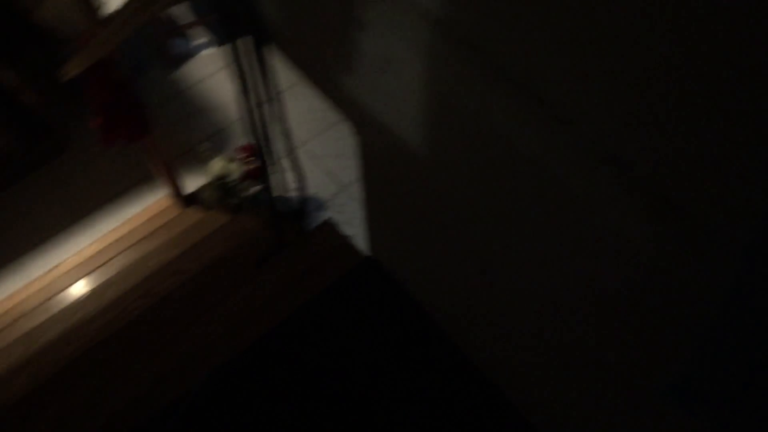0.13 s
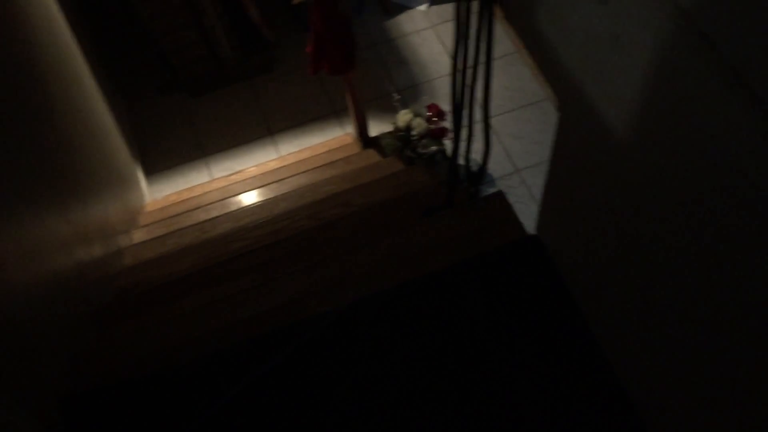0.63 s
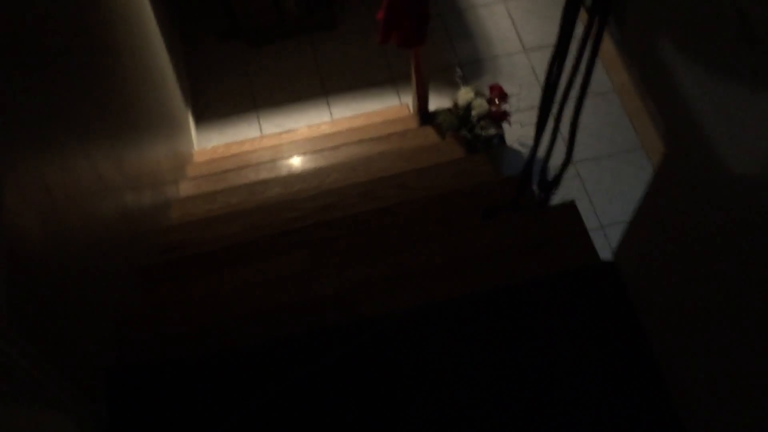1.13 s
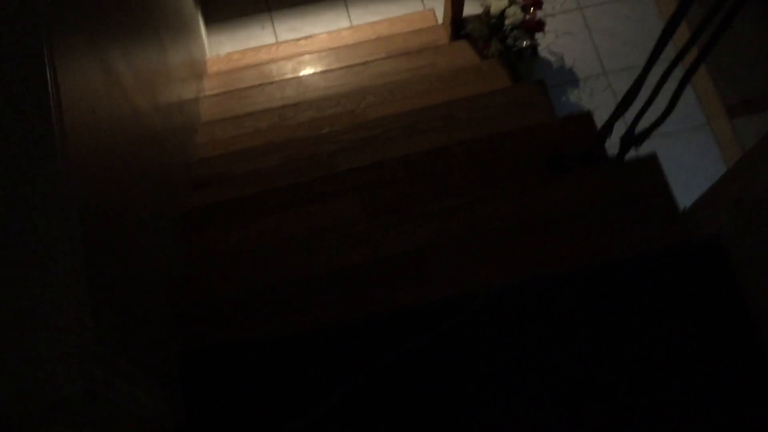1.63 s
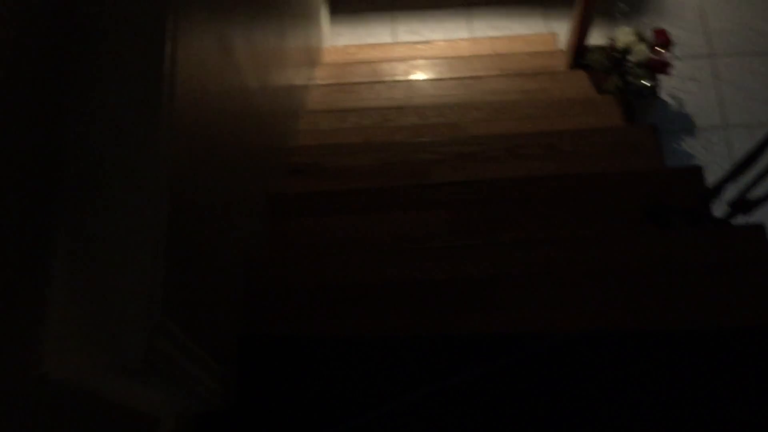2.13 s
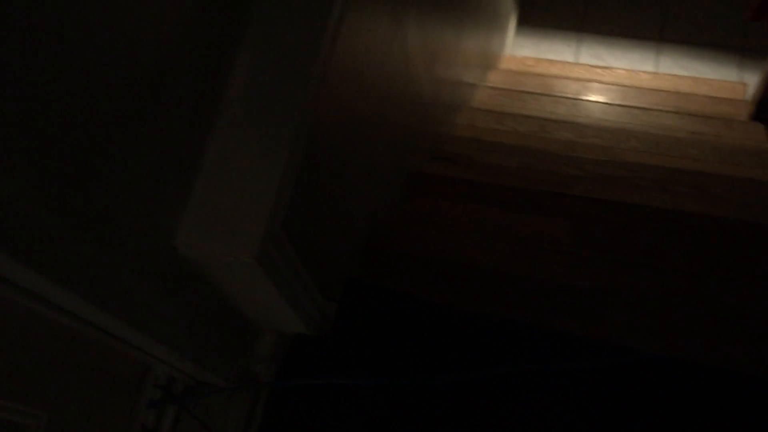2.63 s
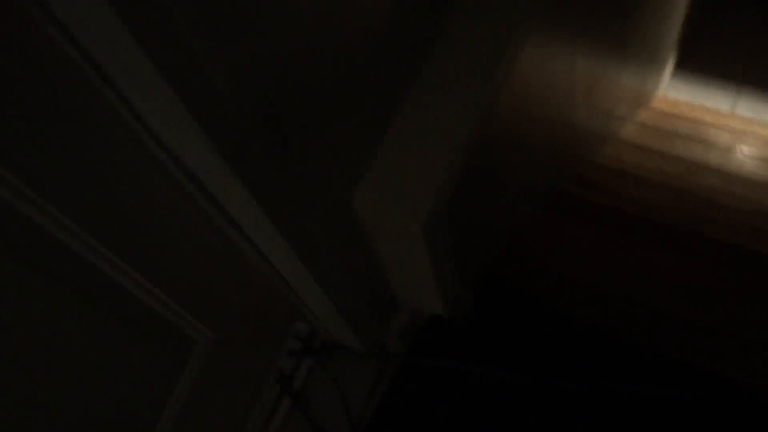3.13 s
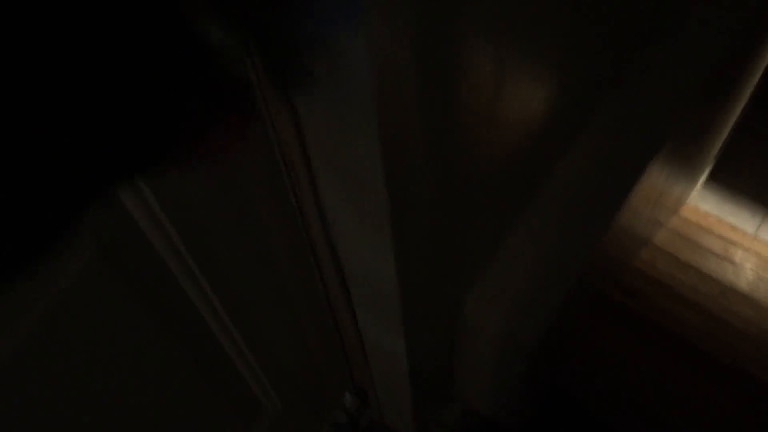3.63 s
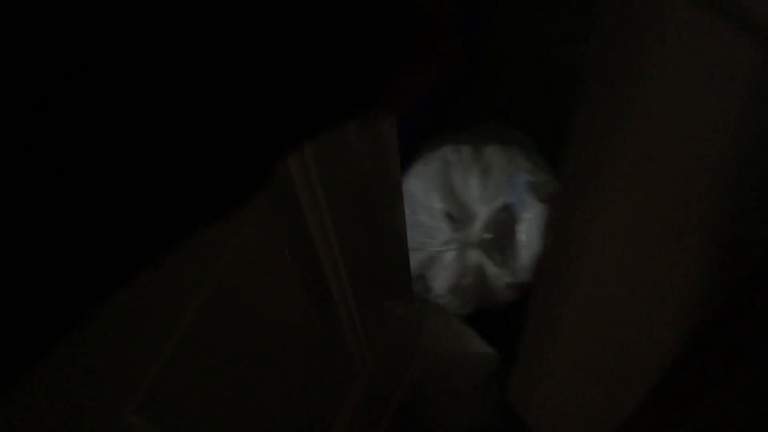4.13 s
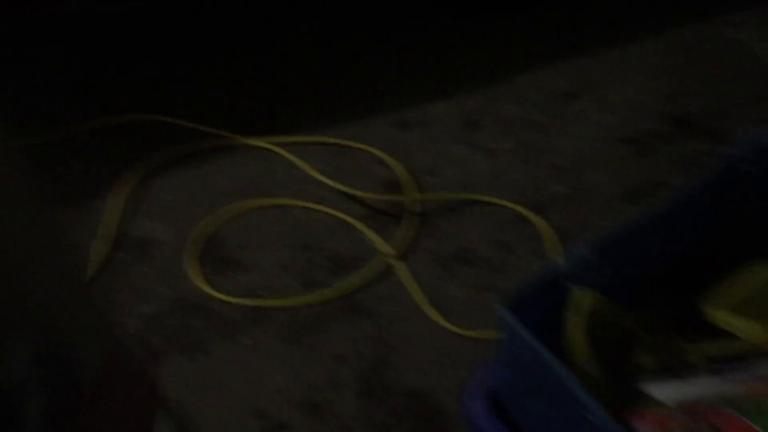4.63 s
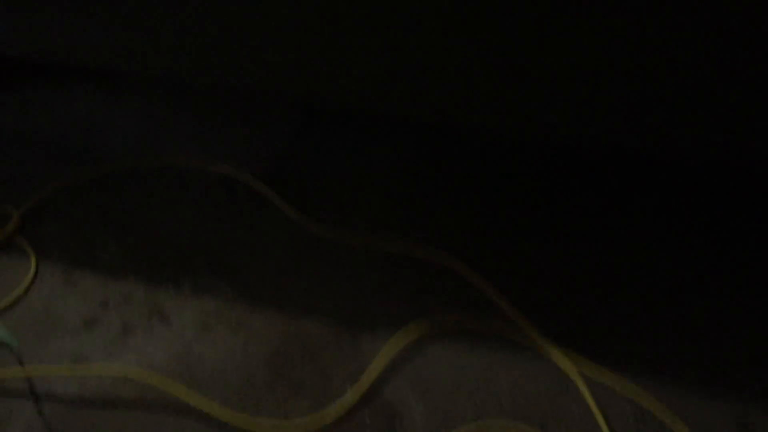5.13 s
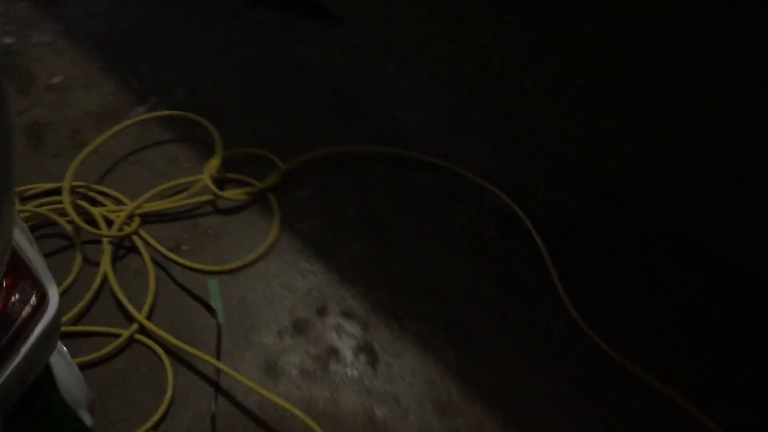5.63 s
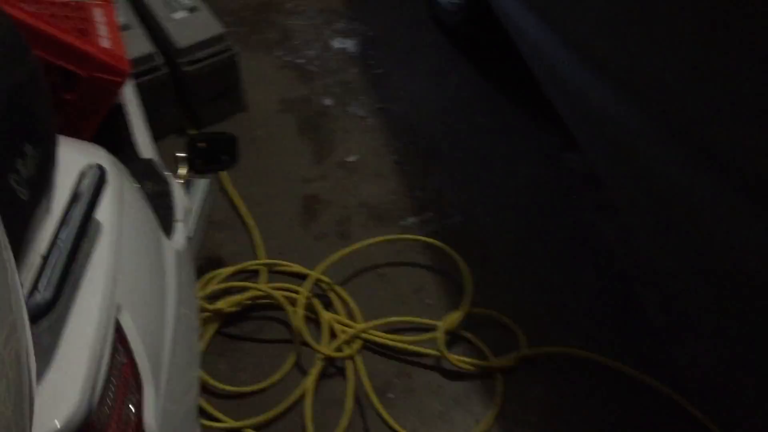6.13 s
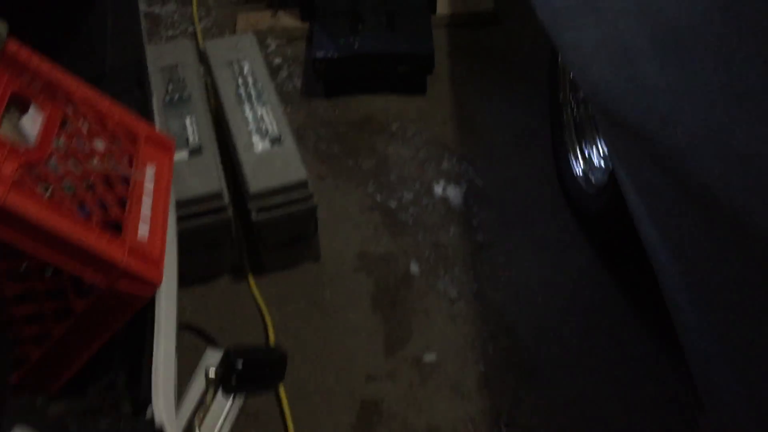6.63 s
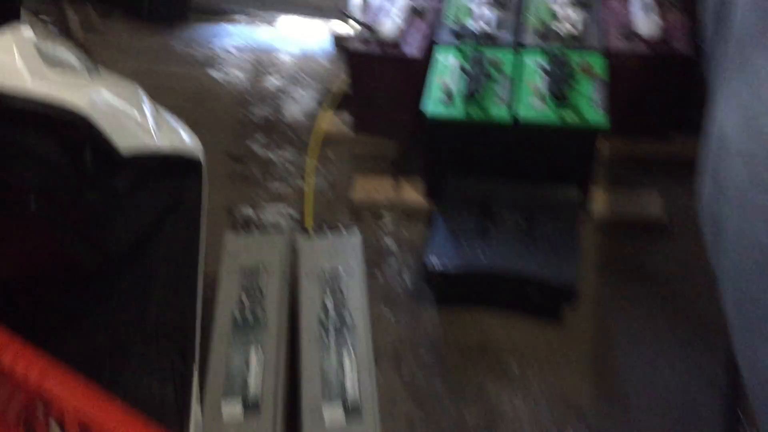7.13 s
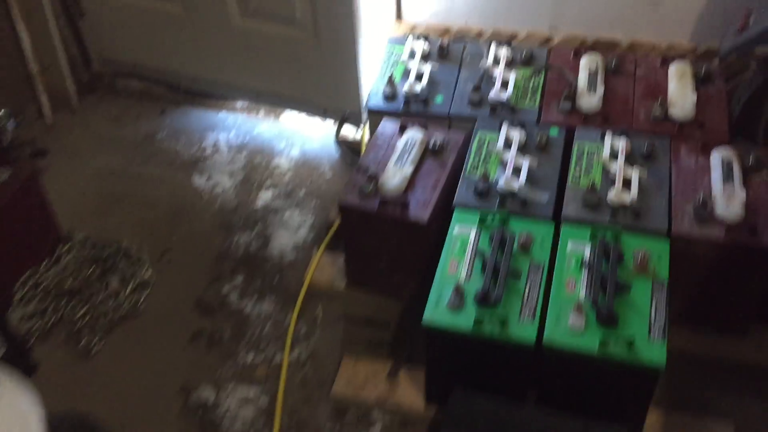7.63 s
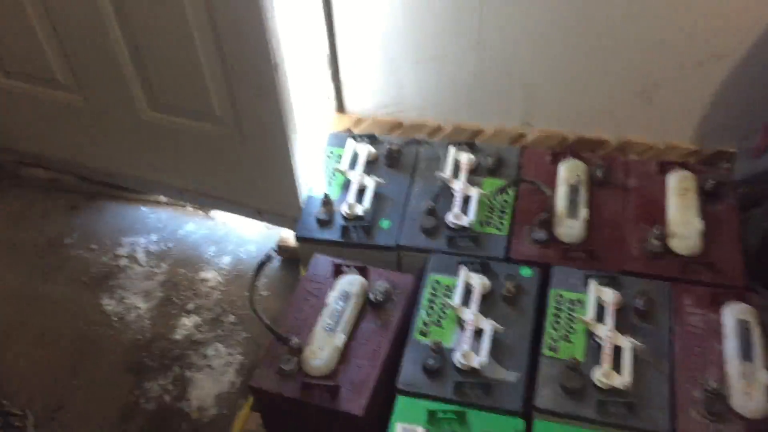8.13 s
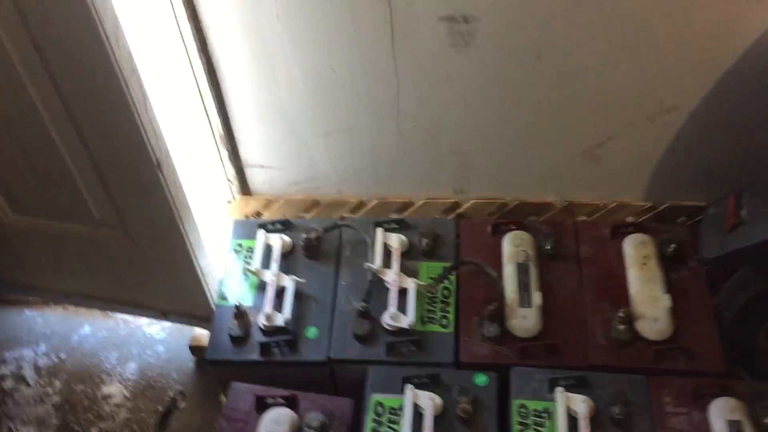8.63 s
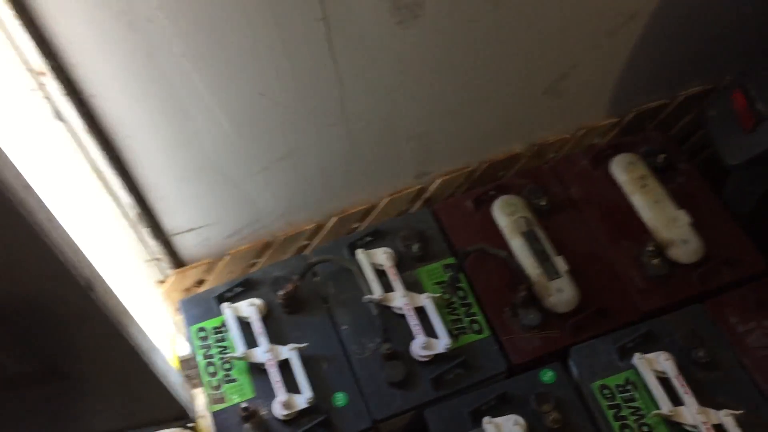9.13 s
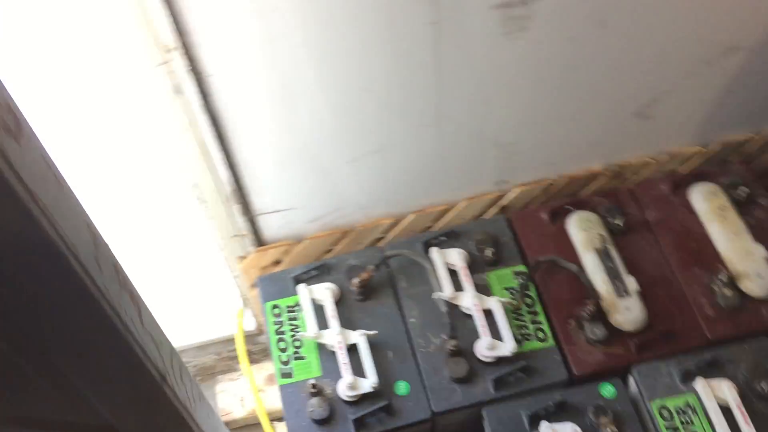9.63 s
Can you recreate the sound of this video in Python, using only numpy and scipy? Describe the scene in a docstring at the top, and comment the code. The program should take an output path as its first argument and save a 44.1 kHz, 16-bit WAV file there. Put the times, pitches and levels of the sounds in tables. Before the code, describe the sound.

Someone treads softly indoors, yanks a stuck door past its frame, jostles the camera, and scuffs over gritty concrete to a final hard clack.

```python
"""Microphone hiss and a faint mains hum lie under the first scuff and heel thud on a wooden landing.
The walker, camera in hand, drags a sticking door open past its frame and crosses a concrete garage.
Heels are low sagging tones, soles tap as noise in a broad resonance, and slides are one stream of grit.
The door is uneven stick-slip pulses ringing its leaf; jolts of the camera are low blows without room."""
import sys
import numpy as np
from scipy import signal
from scipy.fft import rfft, irfft, next_fast_len
from scipy.io import wavfile
from scipy.ndimage import uniform_filter1d, map_coordinates

SR = 44100
rng = np.random.default_rng(int(sys.argv[2]) if len(sys.argv) > 2 else 0)


def rack_gain(trim_db):
    """Turn a fader trim in dB into the linear factor to multiply a signal by."""
    fader = np.asarray(trim_db, float)
    return 10 ** (fader / 20)


def output_pcm(signal):
    """Save a mono or channel-first signal as 16-bit PCM at the path in sys.argv[1].

    Samples are clipped to [-1, 1] before scaling.
    """
    pcm = np.clip(np.atleast_2d(signal).T, -1, 1) * 32767
    wavfile.write(sys.argv[1], SR, np.round(pcm).astype(np.int16))


N = 429975

# weight landing on the floor or the door, before the room answers: [t/s, peak level/dB, f/Hz]
FOOTFALLS = [(0.048, -20.5, 85), (0.226, -38, 66), (0.75, -34, 105), (0.875, -31, 108), (1.055, -34, 127),
             (1.128, -32.5, 118), (1.321, -11.5, 112), (1.354, -20, 101.5), (1.401, -20.5, 108),
             (1.45, -44, 97), (1.846, -31.5, 198), (1.878, -23.5, 130), (1.9, -19, 91), (2.061, -36.5, 116),
             (2.358, -37, 104), (2.935, -26.5, 107), (3.008, -25, 102.6), (3.582, -34, 118),
             (3.635, -29, 118.5), (3.721, -35, 149), (3.895, -30, 221), (3.914, -25, 132),
             (3.993, -37, 143), (5.253, -26.5, 153), (5.281, -28, 154), (5.734, -35, 155), (5.79, -38, 223),
             (6.437, -33, 163), (6.65, -34.5, 89), (6.75, -36, 91), (6.87, -31, 107), (6.958, -39, 140),
             (7.003, -30.5, 110), (7.238, -29, 173), (7.367, -34.5, 115), (7.765, -34.5, 144),
             (8.111, -23.5, 164), (8.839, -31, 189.6), (9.437, -24.5, 195), (9.464, -24, 144),
             (9.52, -32.5, 141)]
# the hand jolting the camera while the door swings: [t/s, peak level/dB, f/Hz]
CAMERA_JOLTS = [(4.212, -22, 97), (4.287, -23.5, 112.3), (4.306, -22.5, 109), (4.426, -18.5, 108),
                (4.459, -26.5, 122), (4.631, -24, 142), (4.668, -21.5, 131), (4.692, -14.5, 200.6),
                (4.748, -23, 132), (4.778, -50, 96), (4.918, -32, 110), (4.963, -24.5, 81.6),
                (5.035, -22.5, 80), (5.115, -38.5, 90)]
# hard contacts of soles and latch: [t/s, peak level of the knock/dB, centre f/Hz, treble level re knock/dB]
CONTACTS = [(0.071, -40.5, 1850, -31.5), (1.319, -24.5, 950, -7.5), (1.391, -30.5, 665, -26.5),
            (1.478, -41.5, 3500, -26), (1.879, -27.5, 705, -25), (2.35, -43, 1800, -26.5),
            (3.586, -51, 1500, -9.5), (3.671, -37.5, 3500, 6), (3.69, -38, 1730, -19),
            (3.716, -39, 2480, -13.5), (3.752, -36, 1900, -22.5), (3.934, -12, 1070, -27.5),
            (3.959, -28, 3500, -8.5), (4.414, -35, 1800, -36), (4.565, -44, 2440, -7),
            (4.575, -25, 280, -33), (4.657, -35, 1320, -32), (4.695, -32, 328, -39),
            (5.241, -33, 600, -14.5), (5.259, -25.5, 5770, -16), (5.294, -17, 420, -23.5),
            (5.722, -18, 663, -43), (5.796, -22, 308, -13.5), (6.03, -45, 1610, -14.5),
            (6.407, -39.5, 1860, -38.5), (6.442, -34.5, 334, -42.5), (6.532, -29.5, 1610, -21),
            (6.742, -27.5, 910, -13.5), (6.916, -32, 1310, -27), (7.028, -35, 1700, -34),
            (7.2, -26.5, 298, -43), (7.241, -19.5, 280, -27.5), (7.534, -39.5, 850, -28),
            (7.765, -40, 470, -6.5), (8.114, -14.5, 1660, -13), (8.841, -43, 396, 10.5),
            (9.399, -38, 1530, -26), (9.442, -4, 1740, -24)]


def unit(x):
    """Scaled to rms 1."""
    return x / np.sqrt(np.mean(x ** 2) + 1e-20)


def along(points, hz):
    """(Hz, value) points read on a log frequency axis."""
    f, v = np.transpose(points)
    return np.interp(np.log(hz + 1), np.log(f + 1), v)


def curves(rows):
    """One value per sample for each column after the time, -120 dB outside the table."""
    s, *cols = np.transpose(rows)
    return [np.interp(np.arange(N) / SR, s, c, left=-120, right=-120) for c in cols]


def wobble(rate):
    """A smooth random curve, rate knots a second."""
    knots = rng.standard_normal(int(N * rate / SR) + 4)
    return map_coordinates(knots, [np.arange(N) * rate / SR])


def filtered(x, response):
    """x times a complex response of frequency."""
    m = next_fast_len(len(x) + SR // 2)
    return irfft(rfft(x, m) * response(np.fft.rfftfreq(m, 1 / SR)), m)[:len(x)]


def body(modes):
    """Causal response of (Hz, width in Hz, dB) resonances, alternating in sign."""
    def response(f):
        return sum((-1) ** k * rack_gain(db) * 1j * f * w / (c * c - f * f + 1j * f * w)
                   for k, (c, w, db) in enumerate(modes))
    return response


def add(track, s, sound):
    """Mixes a sound in at time s."""
    part = track[round(s * SR):][:len(sound)]
    part += sound[:len(part)]


def hiss():
    """Steady microphone noise, strongest in the bass and falling off through the treble."""
    # hiss spectrum: [f/Hz, relative level per Hz/dB]
    hiss_shape = [(20, -15), (60, 7), (130, 3), (300, 0), (700, -5), (1500, -6.5), (4000, -12),
                  (13000, -20), (16000, -21)]
    noise = filtered(rng.standard_normal(N), lambda f: rack_gain(along(hiss_shape, f)))
    return rack_gain(-65.5) * unit(noise)


def hum():
    """A mains tone wavering in pitch and level, that fades once the house is left."""
    # hum level, before its wavering: [t/s, level/dB]
    hum_level = [(0, -69), (2.3, -71), (2.7, -61.5), (3.3, -74.5), (4.2, -81), (9.75, -100)]
    turn = 2 * np.pi * np.cumsum(121 + 3 * wobble(6)) / SR  # around 121 Hz
    return rack_gain(curves(hum_level)[0] + 3.8 * wobble(1.7)) * np.sqrt(2) * np.sin(turn)


def shudder():
    """Lumpy low noise ringing in the joists: a slow swell plus the shake after each thud or jolt."""
    # low rumble under moving weight, before the aftershakes: [t/s, level/dB]
    swell = [(0, -60), (0.62, -67.5), (0.95, -57), (1.63, -63), (3.3, -77), (3.77, -50.5), (4.15, -48.5),
             (4.36, -61), (4.5, -55), (4.58, -71), (4.86, -57), (5.18, -63), (5.24, -72), (5.92, -60),
             (6.4, -71.5), (6.95, -37.5), (7.57, -83), (9.75, -70)]
    # joist resonances: [f/Hz, width/Hz, level/dB]
    joists = [(61, 31, 0.5), (108, 25, -3.5), (172.3, 62, -3)]
    aftershake_db, aftershake_t60_s = -17.5, 0.41  # level is relative to the blow's peak
    lumps = rng.standard_normal(N) * rack_gain(3.2 * wobble(25))
    level, t = rack_gain(curves(swell)[0]), np.arange(SR // 2) / SR
    for s, db, _ in FOOTFALLS + CAMERA_JOLTS:
        shake = rack_gain(db + aftershake_db - 60 * t / aftershake_t60_s)
        add(level, s, shake * (1 - np.exp(-t / 0.022)))
    rumble = filtered(filtered(lumps, body(joists)), body([(96, 68, 0)]))
    return level * unit(rumble)


def grains(spread_db):
    """Noise whose loudness jumps from one grain of grit to the next."""
    return rng.standard_normal(N) * rack_gain(spread_db * wobble(400))


def patchy(x, depth_db):
    """Random small patches of time and pitch ring out or drop back."""
    z = signal.stft(x, nperseg=512)[2]
    over_pitch = uniform_filter1d(rng.standard_normal(z.shape), size=2, axis=0)
    field = uniform_filter1d(over_pitch, size=5, axis=1)
    return signal.istft(z * rack_gain(depth_db * unit(field)), nperseg=512)[1][:N]


def slides():
    """One stream of grit feeds scuff, crunch and treble; pressure sets the floor resonances going."""
    # soles and clothes sliding, and the door edge scraping past its frame:
    # [t/s, length/s, scuff level/dB, grit level re scuff/dB, floor level under pressure re scuff/dB]
    strokes_made = [(0.028, 0.1, -62.5, -15, 1.5), (0.51, 0.2, -64.5, -13.5, -0.5),
                    (0.734, 0.075, -67, -3.5, 17.5), (0.82, 0.076, -61.5, -8, 15.5),
                    (0.956, 0.13, -59.5, -7, 10.5), (1.125, 0.057, -70, -9, 16), (1.31, 0.033, -45, -9, -2),
                    (1.389, 0.053, -47, -19, 8.5), (1.472, 0.027, -57, -13, -4),
                    (1.847, 0.093, -45, -13.5, 10), (2.035, 0.088, -53, -14, 4),
                    (2.34, 0.09, -68.5, -10, 6.5), (2.899, 0.11, -50, -10.5, 9),
                    (3.007, 0.057, -44, -15.5, -4.5), (3.578, 0.095, -55, -6, -1),
                    (3.672, 0.21, -52.5, -17.5, 0), (3.788, 0.022, -34, -10.5, -5),
                    (3.814, 0.11, -33, -14, 0.5), (4.105, 0.12, -70, -10.5, 11),
                    (4.408, 0.025, -48.5, -18, -12), (4.618, 0.075, -55, -17, 11),
                    (5.257, 0.076, -40.5, -21.5, 4), (5.334, 0.069, -63, -16, 13),
                    (5.733, 0.11, -48, -5, 8.5), (5.836, 0.09, -59.5, -5.5, 2),
                    (6.026, 0.062, -56.5, -9, -1), (6.368, 0.092, -63.5, -12, -19),
                    (6.522, 0.056, -51.5, -14.5, 6.5), (6.686, 0.11, -48.5, -15.5, -17),
                    (6.741, 0.19, -45.5, -20.5, 0.5), (6.91, 0.091, -42, -28, -0.5),
                    (7.022, 0.13, -58, -13.5, 2), (7.212, 0.083, -55.5, -4, -3), (7.314, 0.11, -67, -10, 7),
                    (7.762, 0.11, -44.5, -5.5, 0), (7.902, 0.051, -66, 7, 5), (8.086, 0.075, -28, -8, -3),
                    (8.26, 0.043, -59, -2.5, -7), (8.426, 0.13, -78.5, 11, -22),
                    (8.835, 0.079, -47.5, -6.5, 0), (9.053, 0.11, -64, -0.5, 1.5),
                    (9.176, 0.12, -47.5, -5.5, -9), (9.389, 0.13, -53.5, -16.5, -2),
                    (9.44, 0.027, -29, -8, 1), (9.596, 0.065, -57.5, -10.5, 1.5)]
    # scuff spectrum: [f/Hz, relative level per Hz/dB]
    scuff_shape = [(350, -32), (700, -4), (1300, -3), (1700, 0.5), (2200, -2.5), (3500, -9), (5000, -26.5),
                   (6500, -34.5)]
    # treble of loose grit: [f/Hz, relative level per Hz/dB]
    grit_shape = [(2650, -17.5), (4500, -9), (9260, -14.5), (10600, -20.5), (14400, -17.5), (15700, -26.5),
                  (16000, -30)]
    # a sole pressed flat and dragged, passed twice: [f/Hz, width/Hz, level per pass/dB]
    crunch_modes = [(541, 394, 2), (967, 570, 3.5), (1364, 355, 2)]
    # the floor under a sliding sole, passed twice: [f/Hz, width/Hz, level per pass/dB]
    board_modes = [(239.4, 117, 2), (378.7, 76.6, 4.5), (600, 394, -3)]
    struck_rise_s, soft_rise = 0.0017, 0.2  # soft rise is a share of the slide's length
    with_tap_s = 0.014  # a slide this near a tap starts with it

    contact = patchy(grains(spread_db=1.77) * rack_gain(1.7 * wobble(40)), depth_db=3.0)
    scuff = unit(filtered(contact, lambda f: rack_gain(along(scuff_shape, f))))
    crunch = unit(filtered(filtered(contact, body(crunch_modes)), body(crunch_modes)))
    grit = unit(filtered(contact, lambda f: rack_gain(along(grit_shape, f))))
    pressed = grains(spread_db=3) * rack_gain(1.6 * wobble(25))
    boards = unit(filtered(filtered(pressed, body(board_modes)), body(board_modes)))
    strokes = np.zeros((4, N))
    for s, length, db, grit_db, pressure_db in strokes_made:
        tap_s = min((tap[0] for tap in CONTACTS), key=lambda near: abs(near - s))
        rise = soft_rise * length
        if abs(s - tap_s) < with_tap_s:
            s, rise = tap_s, struck_rise_s
        t = np.arange(round((length + 0.12) * SR)) / SR
        # the sliding thing bears down, slows as it slides, and lifts
        fall_db = -8 * t / length - 60 * np.maximum(t - length, 0) / 0.21
        stroke = (1 - np.exp(-t / max(rise, 1e-3))) ** 2 * rack_gain(fall_db)
        stroke /= np.sqrt(np.mean(stroke[t < length] ** 2))
        # the less loose grit, the darker the drag
        dark = np.clip((-grit_db - 7.5) / 16, 0.02, 0.9)
        # the weight on the floor eases off after landing
        pressure = rack_gain(pressure_db - 41 * np.maximum(t - 2 * rise, 0))
        gains = [np.sqrt(1 - dark), np.sqrt(dark), rack_gain(grit_db), pressure]
        for track, gain in zip(strokes, gains):
            add(track, s, rack_gain(db) * gain * stroke)
    return np.sum(strokes * [scuff, crunch, grit, boards], axis=0)


def blows(hits, ring_s, rise, sag, over_db, deep_db):
    """Low cycles that swell, sag in pitch and die, with two overtones and a deep, slower-dying push."""
    out, t = np.zeros(N), np.arange(SR // 2) / SR
    for s, db, hz in hits:
        t60 = ring_s * 100 / hz  # ring_s belongs to 100 Hz; higher blows die sooner
        turn = 2 * np.pi * hz * (t + sag * (1 - np.exp(-t / 0.0084)))
        overtones = np.sin(1.838 * turn) + 0.36 * np.sin(2.997 * turn)
        overtones = overtones * rack_gain(over_db - 60 * t / 0.12)
        # a stiff, high-ringing floor hardly gives way
        push_db = deep_db - 11 * max(np.log2(hz / 115), 0)
        push = rack_gain(push_db + 20 * t / t60) * np.sin(2 * np.pi * 63 * t)
        ring = np.sin(turn) + overtones + push
        ring = ring * rack_gain(-60 * t / t60) * (1 - np.exp(-t / rise)) ** 2
        add(out, s, rack_gain(db) * ring / np.abs(ring).max())
    return out


def thuds():
    """Weight landing: soft blows with a short ring and faint overtones."""
    return blows(FOOTFALLS, ring_s=0.055, rise=0.01, sag=0.0015, over_db=-13, deep_db=-6.0)


def taps():
    """A hard contact: a click and a dying rattle in a broad resonance, plus a shorter crack of treble."""
    out, t = np.zeros(N), np.arange(SR // 5) / SR
    for s, db, hz, treble_db in CONTACTS:
        t60 = 0.033 * (1000 / hz) ** 0.14  # seconds; higher contacts die a little sooner
        rattle, crack = rng.standard_normal((2, len(t)))
        click = 3 * (t == 0)
        struck = (rattle * (1 - np.exp(-t / 0.00083)) + click) * rack_gain(-60 * t / t60)
        knock = filtered(struck, body([(hz, 0.39 * hz, 0), (1.31 * hz, 2.12 * hz, -13)]))
        crack = filtered(crack * rack_gain(-60 * t / (0.6 * t60)), lambda f: (1j * f / (4500 + 1j * f)) ** 2)
        add(out, s, rack_gain(db) * (knock / np.abs(knock).max() + rack_gain(treble_db) * crack))
    return out


def door():
    """The door edge sticks and slips near a ring of the leaf, unevenly, scraping as it goes."""
    # the edge creaking faintly under the pull, then juddering past the frame: [t/s, level/dB]
    judder = [(3.37, -80), (3.42, -65.5), (3.56, -71), (3.78, -58.5), (3.8, -21), (3.822, -33), (3.85, -16),
              (3.865, -20), (3.872, -26.5), (3.882, -22.5), (3.9, -22.5), (3.925, -30.5), (3.95, -26),
              (3.98, -60)]
    # resonances of the door leaf: [f/Hz, width/Hz, level/dB]
    leaf_modes = [(607, 91, -0.5), (850, 71, -10.5), (1160, 280, -10), (1690, 250, -10.5),
                  (2466, 340, -15.5), (3500, 900, -25)]
    rate = 606.3 * rack_gain(0.5 * wobble(150) + 0.3 * wobble(20))  # slips per second
    slips = np.diff(np.floor(np.cumsum(rate / SR)), prepend=0) * rack_gain(3.3 * wobble(300))
    scrape = 0.5 * rng.standard_normal(N)
    groan = filtered(8 * (slips - slips.mean()) + scrape, body(leaf_modes))
    return rack_gain(curves(judder)[0]) * unit(groan)


def jolts():
    """The hand knocks the camera: blows with a longer ring, more sag and stronger overtones than a thud."""
    return blows(CAMERA_JOLTS, ring_s=0.074, rise=0.0084, sag=0.0024, over_db=-5, deep_db=-5)


def room(x):
    """Each frequency of the room's answer dies at its own speed."""
    # decay of the room: [f/Hz, t60/s]
    decay = [(80, 0.46), (300, 0.35), (1500, 0.31), (5000, 0.25), (14000, 0.17)]
    hz, t, z = signal.stft(rng.standard_normal(SR // 2), SR, nperseg=256)
    tail = signal.istft(z * rack_gain(-60 * t / along(decay, hz)[:, None]), SR, nperseg=256)[1]
    late = np.pad(x, (200, 0))  # the answer starts 200 samples after the source
    return signal.fftconvolve(late, tail / np.linalg.norm(tail))[:N]


def scene():
    """Near sounds with their room; jolts reach the microphone dry through the case."""
    low, near, leaf = thuds(), taps() + slides(), door()
    wet = room(rack_gain(-5.5) * low + rack_gain(-9.5) * near + rack_gain(-19) * leaf)
    return (low + jolts() + near + leaf + wet + shudder() + hum())[None]


def low_pass(x):
    """Removes everything above the highest recorded frequency."""
    return signal.sosfilt(signal.butter(12, 16550, fs=SR, output="sos"), x)


def record(dry):
    """The microphone adds its hiss, loses the deepest bass and keeps nothing above its band limit."""
    bass_hz, top_hz = 36, 15700
    heard = filtered(dry[0] + hiss(), lambda f: (1j * f / (bass_hz + 1j * f)) ** 4 * (f < top_hz))
    return low_pass(heard[None])


dry = scene()
out = record(dry)
output_pcm(out)
```